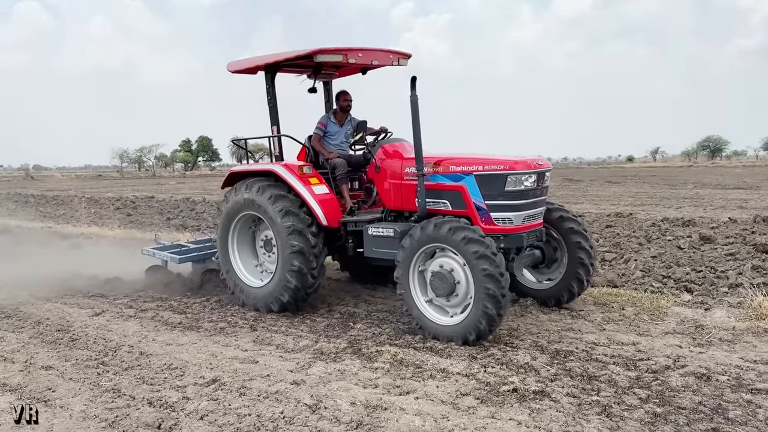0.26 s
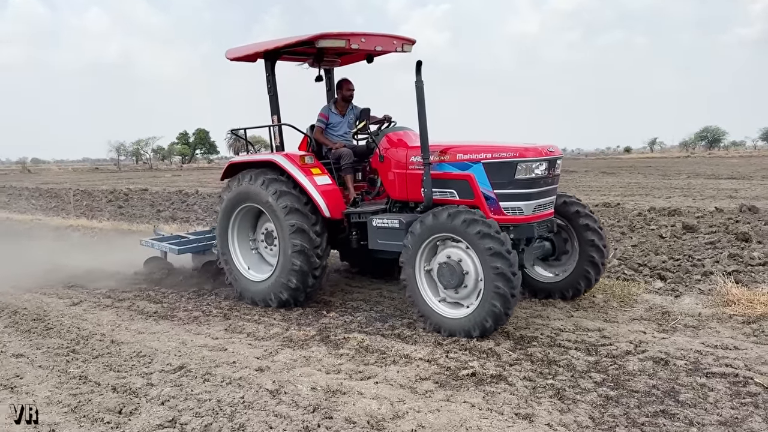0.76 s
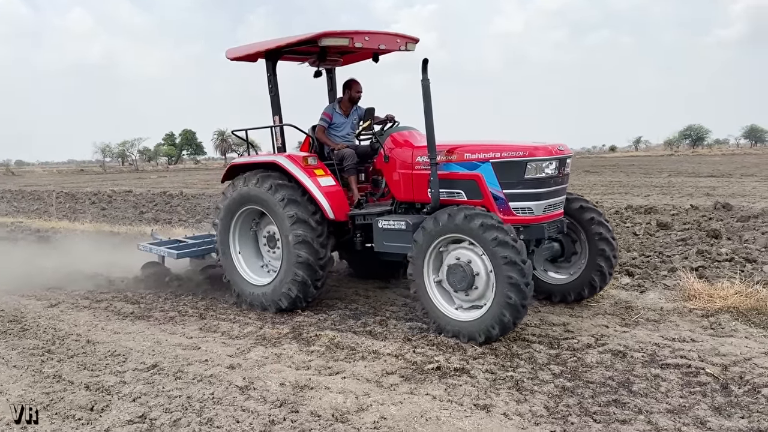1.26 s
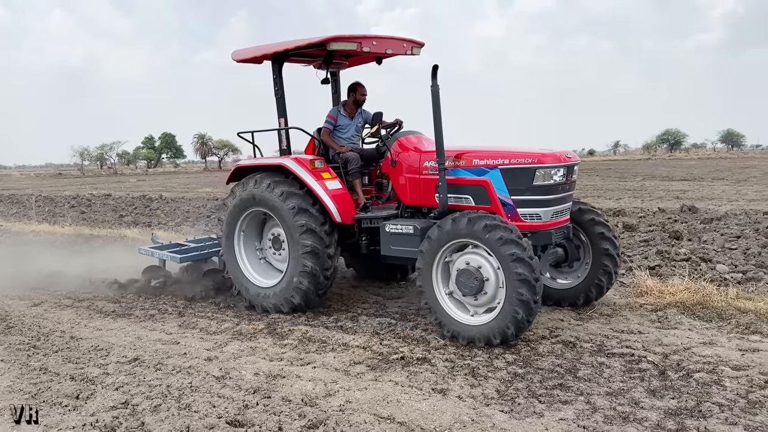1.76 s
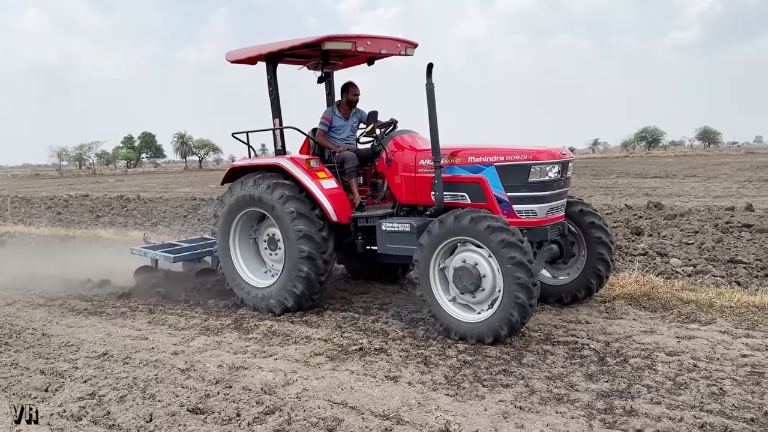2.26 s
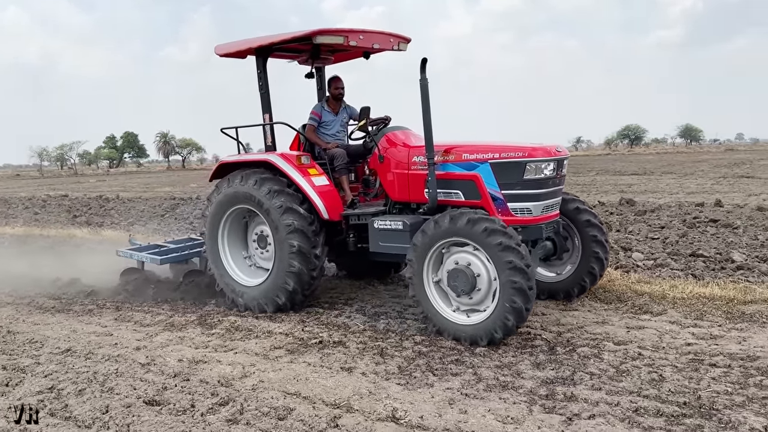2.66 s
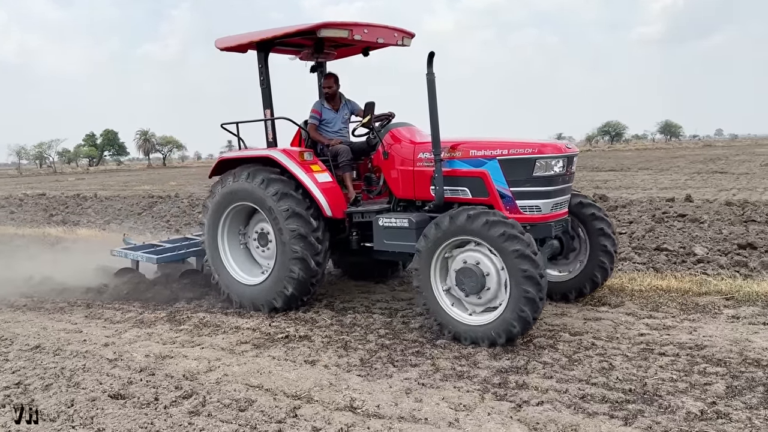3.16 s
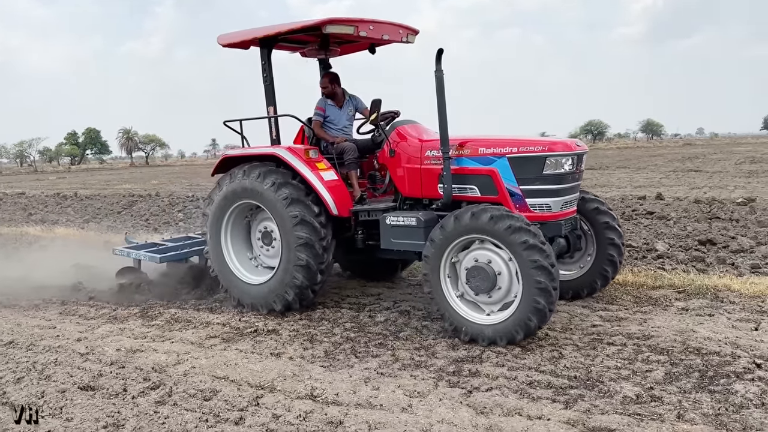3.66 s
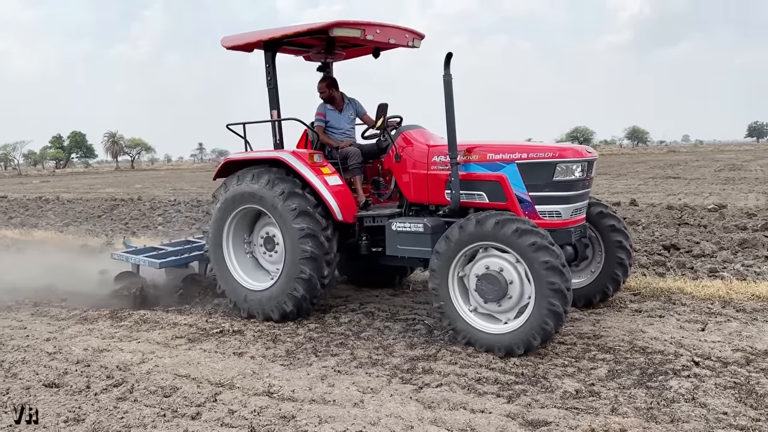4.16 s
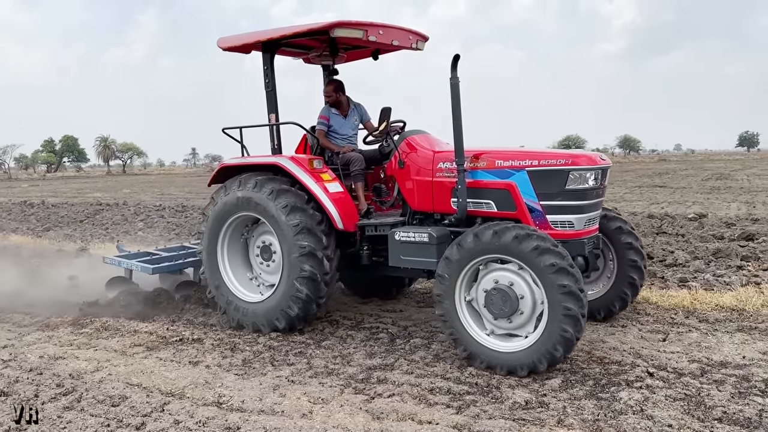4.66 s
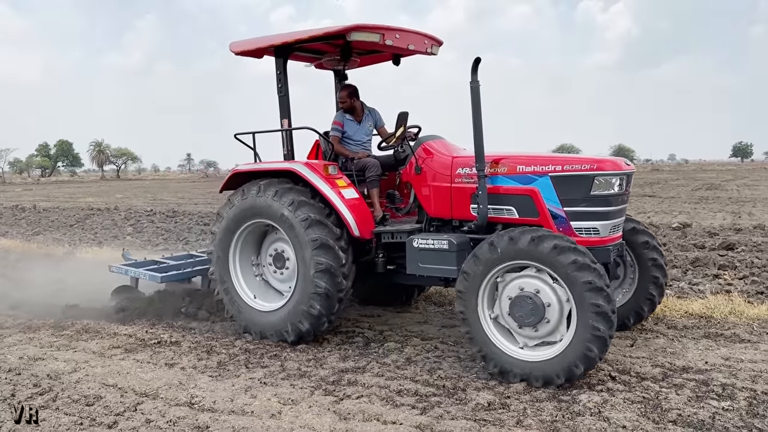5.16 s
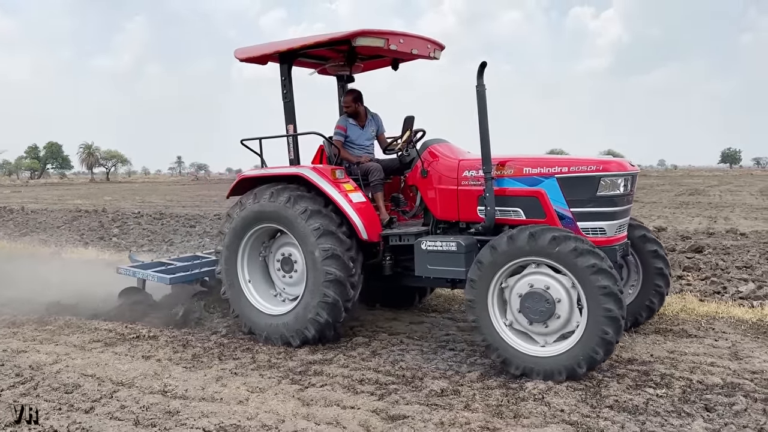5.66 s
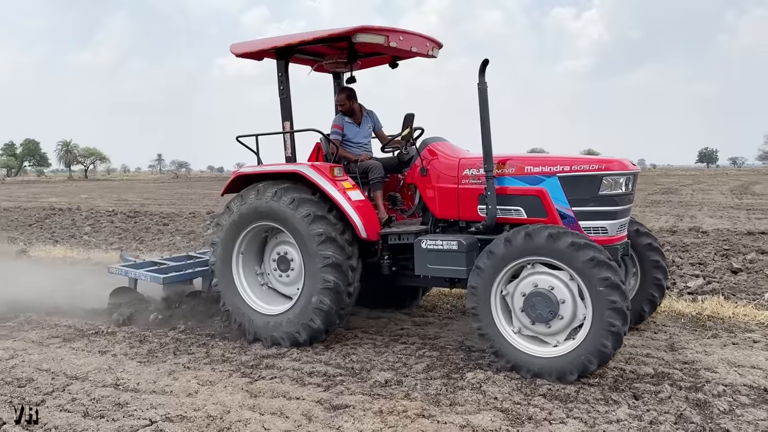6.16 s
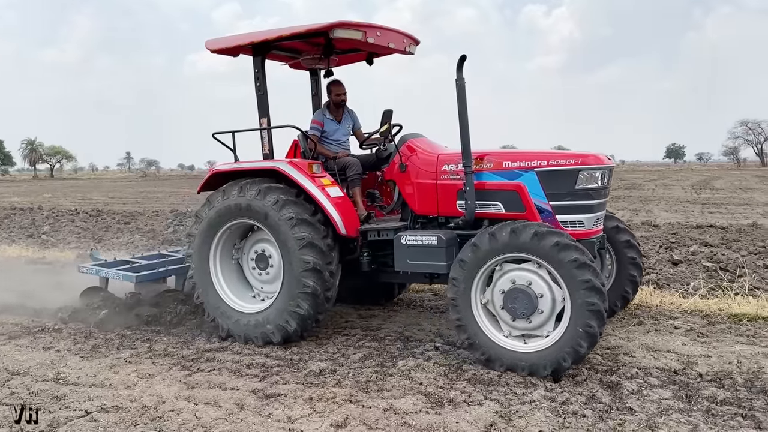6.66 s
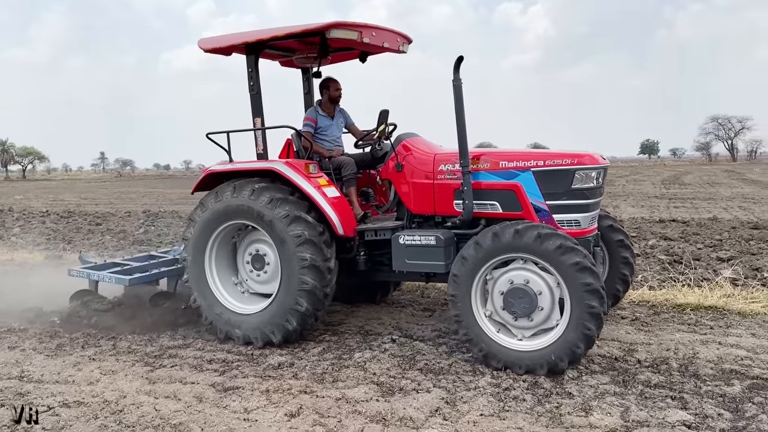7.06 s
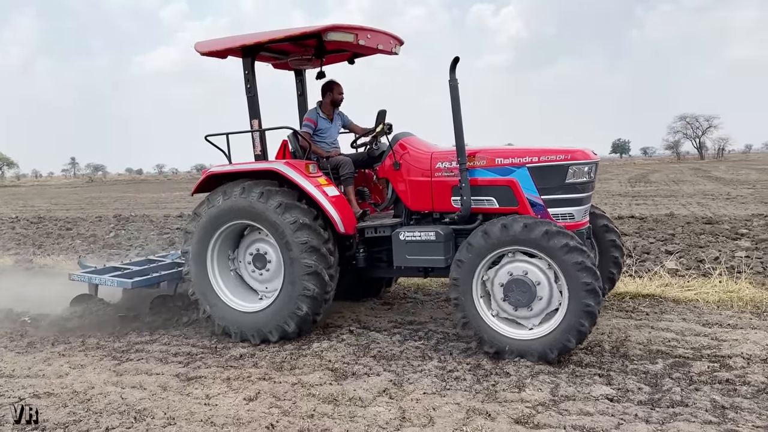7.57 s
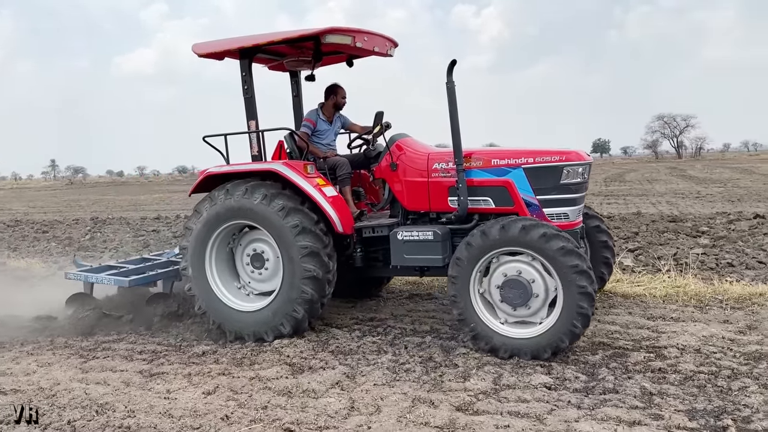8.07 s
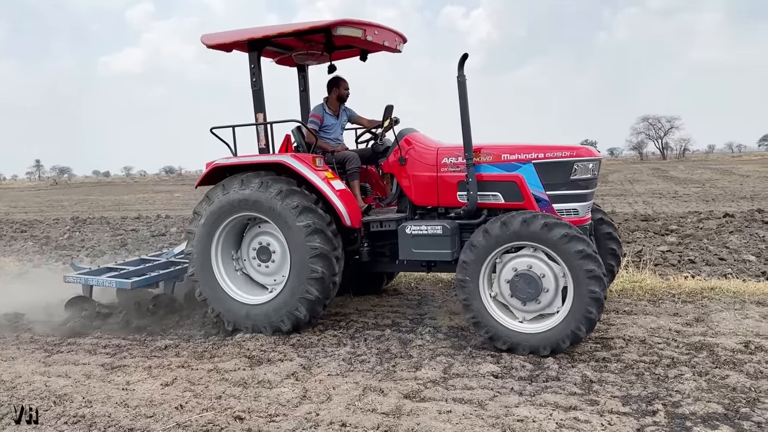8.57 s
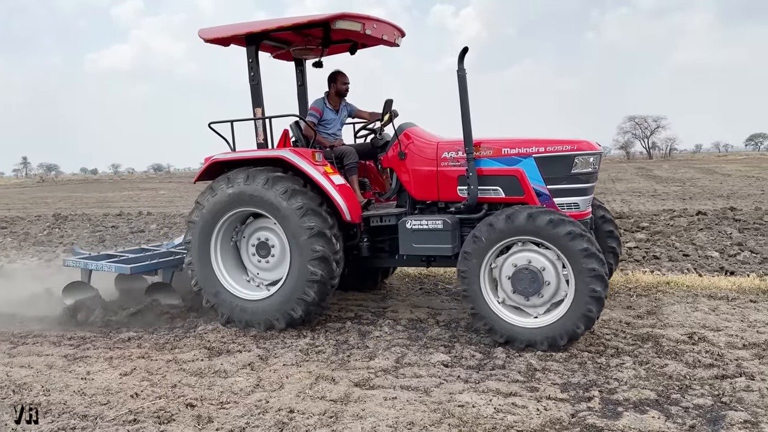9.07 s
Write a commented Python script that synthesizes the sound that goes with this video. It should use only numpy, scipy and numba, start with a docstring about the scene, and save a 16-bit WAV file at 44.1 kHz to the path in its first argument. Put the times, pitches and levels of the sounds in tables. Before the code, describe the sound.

A tractor's four-cylinder diesel knocks and thumps steadily under load, dragging a harrow through dry soil while wind buffets the microphone.

```python
"""A four-cylinder diesel tractor hunts around 980 rpm, dragging a disc harrow over dry soil a few metres off.
Each firing excites block, sheet metal and exhaust resonances, harder while the governor regains speed.
Fan and soil are shaped noise; at the phone's two microphone ports gusts are low noise puffs and brief swings.
The bass drops after the strongest gust."""
import sys
import numpy as np
from scipy import signal
from scipy.fft import rfft, irfft
from scipy.io import wavfile
from scipy.ndimage import uniform_filter1d
from numba import njit

SR = 44100
rng = np.random.default_rng(int(sys.argv[2]) if len(sys.argv) > 2 else 0)


def natural_amplitude(level_db):
    """Convert a level in decibels to a linear amplitude factor, elementwise."""
    exponent = np.asarray(level_db, float) / 20
    return 10 ** exponent


def int16_out(signal):
    """Quantize to a 16-bit WAV file."""
    q = np.round(np.clip(np.atleast_2d(signal).T, -1, 1) * 32767)
    wavfile.write(sys.argv[1], SR, q.astype(np.int16))


N = 411012
T = np.arange(N) / SR
HZ = np.maximum(np.arange(N // 2 + 1) * SR / N, 1)

# engine speed as it hunts: time_s, firings_per_s
SPEED = [(0.0, 30.41), (0.3, 33.67), (0.8, 31.98), (1.17, 34.25), (1.39, 31.6), (2.01, 34.21),
         (2.34, 31.23), (2.69, 33.85), (3.16, 32.5), (3.71, 34.01), (3.99, 30.98), (4.34, 34.35),
         (4.59, 32.42), (5.34, 32.37), (5.62, 30.84), (6.24, 33.58), (6.86, 30.49), (7.25, 33.96),
         (8.12, 30.4), (8.53, 34.11), (9.02, 31.63), (9.32, 31.52)]
# spectrum of a knock, its overall level set later: freq_hz, relative_density_db
KNOCK = [(120, -61), (300, -21.5), (700, -20), (1300, -22), (1550, -22), (2700, -28), (3100, -28.5),
         (5000, -35), (6000, -45.5), (10000, -42), (16000, -50)]


def level(x, db):
    """Scale to an rms level in dB."""
    return x * natural_amplitude(db) / np.sqrt(np.mean(x ** 2))


def along(table, axis):
    """Columns of a table read along time or frequency."""
    points = np.array(table).T
    return [np.interp(axis, points[0], column) for column in points[1:]]


def colour(x, table):
    """Shape the spectrum by (Hz, dB) points on a log frequency axis."""
    hz, db = np.array(table).T
    gain = natural_amplitude(np.interp(np.log(HZ), np.log(hz), db))
    return irfft(rfft(x) * gain, N)


def split(x, hz, side="low"):
    """One side of a second-order Butterworth filter."""
    return signal.sosfilt(signal.butter(2, hz, side, fs=SR, output="sos"), x)


def ring(x, hz, width):
    """A fixed resonance with gain 1 at its centre."""
    return signal.lfilter(*signal.iirpeak(hz, hz / width, fs=SR), x)


@njit
def sweep(x, hz, width):
    """State-variable band-pass whose centre moves."""
    out, band, low = np.empty(len(x)), 0., 0.
    for i in range(len(x)):
        g, damping = np.tan(np.pi * hz[i] / SR), width / hz[i]
        v = (band + g * (x[i] - low)) / (1 + g * (g + damping))
        band, low, out[i] = 2 * v - band, low + 2 * g * v, damping * v
    return out


def sweep_rows(x, hz, width):
    """The moving band-pass on each row of noise."""
    return np.array([sweep(row, hz, width) for row in x])


def walk(rate):
    """Random levels held 1 / rate s and smoothed twice."""
    hold = int(SR / rate)
    steps = np.repeat(rng.standard_normal(N // hold + 1), hold)
    return 1.16 * uniform_filter1d(uniform_filter1d(steps, hold), hold)[:N]


def noise():
    """Three unrelated noises: one for both ports, one for the left alone, one for the right alone."""
    return rng.standard_normal((3, N))


def wind():
    """Turbulent puffs over a thin rumble at the microphones; strong gusts reach higher in pitch."""
    # gust strength before its random waver: time_s, level_db
    gusts = [(0, -20.5), (.3, -19.5), (.85, -22.5), (1.0, -25), (1.6, -23.5), (1.8, -21), (2.35, -22),
             (2.68, -16.5), (2.78, -30.5), (3.4, -23), (4.0, -31.5), (4.15, -20), (4.48, -16.5), (4.7, -20),
             (5.0, -17), (5.2, -22), (5.8, -19.5), (6.3, -24.5), (6.5, -19.5), (7.1, -22.5), (7.38, -28),
             (7.5, -20.5), (8.0, -18.5), (8.2, -14.5), (8.45, -15.5), (8.6, -13), (8.68, -15), (8.9, -19.5),
             (9.32, -15.5)]
    # buffeting spectrum before levelling: freq_hz, relative_density_db
    buffeting = [(12, -48), (24, -29), (34, -23), (55, -3.5), (95, -2.5), (210, -7), (430, -23),
                 (800, -60.5)]
    eddies_per_s = 40
    gust_db, = along(gusts, T)
    gust_db = gust_db + 0.92 * walk(8.1)
    # each 10 ms slot may hold one eddy, each its own size
    chance = rng.random((N // 441, 2))
    size = (chance[:, 0] < eddies_per_s / 100) * natural_amplitude(4.0 * chance[:, 1])
    puffs = uniform_filter1d(uniform_filter1d(np.repeat(size, 441)[:N], 300), 300)
    eddies = colour(natural_amplitude(1.8 * walk(22)) * (0.83 + puffs) * noise(), buffeting)
    low = split(eddies, 130)
    bright = np.clip((gust_db + 25.5) / 13, 0, 1.6)
    high = bright * natural_amplitude(1.5 * walk(45)) * (eddies - low)
    return level(low + high, -0.11) * natural_amplitude(gust_db)


def thuds():
    """A hard eddy sucks the diaphragms out, then pushes them back: little more than one swing."""
    # hardest eddies, level scaling the swing: start_s, level_db, pitch_hz
    hard_eddies = [(0.247, -13, 84.5), (0.45, -7.5, 121), (0.669, -11, 152), (0.898, -12, 113),
                   (2.471, -11, 83.4), (2.673, -2.5, 105), (4.089, -7, 171), (4.161, -2, 113),
                   (4.289, -8, 91), (4.372, -5, 125), (4.435, -8, 200), (4.502, -9, 170), (4.516, -7, 90.5),
                   (4.583, -10, 207), (4.984, -4.5, 75), (7.471, -7, 87.5), (7.738, -5, 71),
                   (8.061, -13, 191), (8.159, -12, 149), (8.231, -5.5, 97.6), (8.29, -9.5, 110),
                   (8.378, 1, 100.5), (8.51, -5, 102), (8.569, -15, 110), (8.59, -9, 191),
                   (8.629, -10, 105), (8.688, -5, 101), (8.723, -6, 150), (8.831, -6, 303)]
    swings = np.zeros(N)
    for start_s, level_db, pitch_hz in hard_eddies:
        age = T - start_s - 1.297 / pitch_hz  # s from the middle of the swing
        envelope = np.exp(-(age * pitch_hz / 0.55) ** 2)
        swings += natural_amplitude(level_db) * envelope * np.sin(2 * np.pi * pitch_hz * age)
    # shares: both ports, left alone, right alone
    return swings * np.array([[1], [.4], [-.4]])


def harrow():
    """Fan hiss and clods tumbling off the discs: noise that flickers, its treble by itself."""
    # fan and soil spectrum before levelling: freq_hz, relative_density_db
    spectrum = [(60, -12.5), (200, -20), (420, -23.5), (700, -24.5), (1300, -30), (1550, -31), (2700, -34),
                (3100, -38), (6000, -48), (10000, -53), (16000, -52.5)]
    flicker_db = .6 * walk(3) + 1.2 * walk(25)
    hiss = level(colour(natural_amplitude(flicker_db) * noise(), spectrum), -25.5)
    treble = split(hiss, 3000, "high")
    return hiss + (natural_amplitude(0.95 * walk(14)) - 1) * treble


def firings():
    """Crank timing: number of the current firing, seconds since it, and chance values for each firing."""
    rate, = along(SPEED, T)
    turns = .32 + np.cumsum(rate) / SR  # in firings
    count = turns.astype(int)
    return count, (turns - count) / rate, rng.standard_normal((count[-1] + 1, 20))


def load():
    """Slow levels as the tractor turns side-on, plus fuel that follows the gain in engine speed."""
    # before fuel is added: time_s, knock_db, bonnet_panel_db, tin_rattle_db,
    # drifting_resonance_hz, drifting_resonance_db, exhaust_db
    levels = [(0, -35.5, -36, -43.5, 1160, -38.5, -21.5), (1.2, -32.5, -42, -49, 1197, -35.5, -20.5),
              (2.4, -32.5, -37, -47, 1264, -31.5, -21.5), (3.3, -34, -39, -46, 1306, -30.5, -19),
              (4.6, -31.5, -33.5, -50.5, 1257, -31.5, -19.5), (5.1, -32.5, -33, -51, 1160, -34, -19.5),
              (5.65, -31, -26, -49, 1220, -39, -20), (6.2, -31.5, -35, -67, 1280, -35.5, -19.5),
              (7.1, -32, -34.5, -44, 1233, -33, -21), (8.1, -30, -34, -44.5, 1237, -32, -17.5),
              (8.9, -32, -32, -43.5, 1220, -36.5, -24.5), (9.32, -29.5, -41, -36, 1250, -30, -20)]
    # dB for each firing per second gained in a second: knock, panel, tin, drifting resonance, exhaust
    fuel_db = [0.17, 0.11, 0.52, 0.21, 0.18]
    knock_db, panel_db, tin_db, ridge_hz, ridge_db, thump_db = along(levels, T)
    rate, = along(SPEED, T)
    governor_s = 0.19  # the gain in speed is averaged over this time
    fuel = uniform_filter1d(np.gradient(rate) * SR, int(governor_s * SR))
    slow_db = np.array([knock_db, panel_db, tin_db, ridge_db, thump_db])
    return ridge_hz, slow_db + np.outer(fuel_db, fuel)


def strokes(count, since, chance, cylinder_db, knock_db):
    """Size and lateness of each combustion: its cylinder and chance, or a set hard knock."""
    # hardest knocks, level aimed at their peak: start_s, level_db
    hard = [(0.791, -16.5), (0.822, -18), (1.037, -14), (1.644, -15.5), (2.372, -19), (3.824, -16.5),
            (3.946, -18.5), (4.074, -23), (4.198, -17.5), (4.232, -16), (4.317, -15), (4.801, -15.5),
            (4.864, -18.5), (4.927, -15.5), (5.171, -19), (5.578, -14.5), (5.673, -16), (5.835, -16),
            (5.928, -16.5), (6.293, -14.5), (6.791, -13.5), (6.95, -15.5), (7.048, -16), (7.078, -17),
            (7.171, -13.5), (7.935, -17), (8.097, -15), (8.165, -13.5)]
    late_s = np.abs(0.00112 * chance[:, 0])
    size_db = cylinder_db + 1.7 * np.clip(chance[:, 1], -3, 1.5)
    start_s, hard_db = np.transpose(hard)
    at = ((start_s + 0.00734) * SR).astype(int)
    crest_db = 11  # a typical knock peaks this far above the knock level
    size_db[count[at]] = hard_db - knock_db[at] - crest_db
    late_s[count[at]] = np.clip(since[at] - 0.008, 0, 0.01)
    return size_db, late_s


def burst(count, age, size_db, decay_s, rise_s):
    """Envelope of each combustion: quick rise, slower fall, every one its own size."""
    return natural_amplitude(size_db[count]) * (1 - np.exp(-age / rise_s)) * np.exp(-age / decay_s)


def piston_clonk(count, age, chance, size_db):
    """Each ignition slaps the piston: two or three swings that swell, die and sag, at their own pitch."""
    swell_s = .0019
    pitch_hz = 720 * np.exp(0.3 * np.clip(chance[count, 18], -2, 2) - age / 0.025)
    swell = (age / swell_s * np.exp(1 - age / swell_s)) ** 2
    clonk_db = -7 + size_db[count] + 0.8 * np.clip(chance[count, 19], -2, 1)
    return natural_amplitude(clonk_db) * swell * np.sin(2 * np.pi * (pitch_hz * age + chance[count, 3]))


def block_knock(count, age, chance, size_db, blows):
    """Combustion blows and piston clonk, with the ringing modes of block and covers."""
    # modes of block and covers, before each stroke's own share: pitch_hz, width_hz, relative_db
    modes = [(350, 29, 8.5), (935, 100, 12.5), (1830, 130, -6), (2070, 720, -8), (2550, 230, -0.5),
             (3700, 380, -5.5), (5900, 170, -9.5)]
    # no two strokes strike the block alike
    block = 0
    for k, (pitch_hz, width_hz, mode_db) in enumerate(modes):
        share_db = mode_db + 7.0 * np.clip(chance[count, 6 + k], -2, 1.2)
        block = block + ring(natural_amplitude(share_db) * blows, pitch_hz, width_hz)
    # hard strokes gain only bass; the treble of a stroke varies on its own
    body = split(blows, 1500)
    edge_gain = natural_amplitude(chance[count, 5] - size_db[count]) * (0.28 + 1.2 * np.exp(-age / 0.0098))
    edge = (blows - body) * edge_gain
    # the topmost fizz varies again by itself
    fizz = split(edge, 7000, "high")
    edge = edge + (natural_amplitude(4.2 * chance[count, 16]) - 1) * fizz
    direct = colour(body + edge + piston_clonk(count, age, chance, size_db), KNOCK)
    return level(level(direct, 0) + level(block, -7.0), 2.43)


def bonnet_panel(blows):
    """The bonnet panel rings low under the blows and a little steady noise."""
    return level(ring(ring(blows + .5 * noise(), 569.6, 22.0), 558, 50), -4.5)


def drifting_resonance(blows, ridge_hz):
    """A broad resonance near 1.2 kHz that slowly drifts, perhaps the ground echo."""
    driven = blows + 0.4 * noise()
    return level(sweep_rows(sweep_rows(driven, ridge_hz, 190.0), ridge_hz, 370.0), -2.8)


def tin_rattle(count, age, chance, size_db):
    """Loose sheet metal rattles at another pitch on every stroke."""
    shake_db = 5.5 * np.clip(chance[:, 2], -2, 1.5) + 1.1 * size_db
    shake = burst(count, age, shake_db, decay_s=0.0072, rise_s=0.00032)
    tin_hz = uniform_filter1d(4720 + 120 * chance[count, 17], 64)
    return level(sweep_rows(ring((shake + 0.074) * noise(), 3960, 1400), tin_hz, 280.0), -1.3)


def ringing_metal(gate, blows):
    """A cover sings in a narrow band and the tin holds a lasting three-part ring."""
    # time_s, singing_cover_db, lasting_tin_ring_db
    levels = [(0, -38, -55), (.5, -40, -65), (1.2, -41, -66), (2.2, -47.5, -64), (2.9, -45, -49),
              (3.3, -36.5, -40.5), (3.9, -45, -62), (5, -52, -57), (6.6, -67, -59), (7.3, -53, -53),
              (8.2, -40, -47), (9.32, -43, -64)]
    cover_db, lasting_db = along(levels, T)
    cover = ring(ring(blows + .5 * noise(), 757.0, 17.0), 777, 37)
    lasting = sum(ring((gate / gate.mean() + 0.4) * noise(), hz, 45.0) for hz in (4640, 4760, 4900))
    return level(cover, 0) * natural_amplitude(cover_db) + level(lasting, 0) * natural_amplitude(lasting_db)


def small_parts(count, chance, gate):
    """Small parts chime briefly, each stroke at its own pitch, beside a metallic jangle near 2.7 kHz."""
    # time_s, chime_db, jangle_db
    levels = [(0, -51, -50), (1.8, -50, -50), (2.4, -45, -48), (3.3, -46, -48), (4.3, -50, -47),
              (5, -50, -43), (7.7, -50, -43), (8.2, -47, -43), (9.32, -51, -46)]
    chime_db, jangle_db = along(levels, T)
    chime_hz = 5200 * np.exp(0.238 * np.clip(chance[count, 15], -2, 2))
    chime = sweep_rows(sweep_rows(gate * noise(), chime_hz, 260.0), chime_hz, 420.0)
    jangle = ring(ring(np.sqrt(gate) * noise(), 2610, 240.0), 2650, 330.0)
    return level(colour(chime, KNOCK), 0) * natural_amplitude(chime_db) + level(jangle, 0) * natural_amplitude(jangle_db)


def exhaust(count, chance, cylinder_db):
    """One puff of gas a firing reaches the stack a little later and rings its pipe tones."""
    # pipe tones before wavering and levelling: pitch_hz, width_hz, relative_db, signed_gain
    stack = [(33, 40, -15, 0.84), (65.8, 49, -2.5, -0.61), (95.2, 37.8, 0.5, 0.87), (134, 12, -33, -0.48),
             (194, 53, -10, -0.45), (275.5, 107, -14.5, 0.64)]
    delay_s, waver_db = 0.0028, 2.2  # waver scale at 200 Hz; higher tones waver more
    jitter = (0.0002 * SR * chance[1:, 3]).astype(int)
    at = np.flatnonzero(np.diff(count)) + int(delay_s * SR) + jitter
    puffs = np.zeros(N)
    puffs[np.clip(at, 0, N - 1)] = natural_amplitude(0.46 * cylinder_db[1:] + 1.0 * chance[1:, 4])
    tones = 0
    for hz, width, tone_db, sign in stack:
        gain = sign * natural_amplitude(tone_db + waver_db * hz / 200 * walk(7))
        tones = tones + gain * ring(ring(puffs, hz, width), hz, width)
    return level(tones, 0)


def engine():
    """Block knock, ringing and rattling metal and the exhaust thump, all on one crank."""
    # the four cylinders in firing order: relative_db
    cylinders = [-1.55, -3.1, 1.5, -1]
    count, since, chance = firings()
    cylinder_db = np.resize(cylinders, len(chance))
    ridge_hz, (knock_db, panel_db, tin_db, ridge_db, thump_db) = load()
    size_db, late_s = strokes(count, since, chance, cylinder_db, knock_db)
    age = np.maximum(since - late_s[count], 0)  # s since combustion
    gate = burst(count, age, size_db, decay_s=0.012, rise_s=0.0017)
    # a fast random waver roughens each burst
    blows = gate * natural_amplitude(0.55 * walk(400)) * noise()
    sound = block_knock(count, age, chance, size_db, blows) * natural_amplitude(knock_db)
    sound = sound + bonnet_panel(blows) * natural_amplitude(panel_db)
    sound = sound + drifting_resonance(blows, ridge_hz) * natural_amplitude(ridge_db)
    sound = sound + tin_rattle(count, age, chance, size_db) * natural_amplitude(tin_db)
    sound = sound + ringing_metal(gate, blows) + small_parts(count, chance, gate)
    thump = exhaust(count, chance, cylinder_db) * natural_amplitude(thump_db)
    # thump shares: both ports, left alone, right alone
    return sound + thump * np.array([[1], [.6], [.6]])


def dips(x):
    """Take out part of two narrow bands that slide as the tractor turns, likely the ground echo."""
    # time_s, upper_hz, upper_depth (0-1), lower_hz, lower_depth (0-1)
    valleys = [(0, 1540, 0.34, 810, 0.45), (1.5, 1550, 0.43, 800, 0.4), (1.9, 1400, 0.8, 860, 0.4),
               (2.15, 1600, 0.9, 1080, 0.5), (3.5, 1500, 0.5, 1110, 0.1), (4.3, 1500, 0.6, 1090, 0.44),
               (5.2, 1370, 0.2, 1090, 0), (6.3, 1450, 0.25, 1010, 0), (7.0, 1440, 0.46, 960, 0.3),
               (7.6, 1460, 0.2, 955, .5), (9.32, 1450, .4, 1040, 0.1)]
    upper_hz, upper, lower_hz, lower = along(valleys, T)
    for hz, depth, width in [(upper_hz, upper, 200.0), (lower_hz, lower, 90.0)]:
        x = x - np.clip(depth, 0, 1) * sweep_rows(x, hz, width)
    return x


def scene():
    """Each microphone port hears the common sound, shifted in phase, and a part of its own."""
    # freq_hz, common_power_share (0-1), left_lead_rad, left_minus_right_db
    port_table = [(0, .86, .1, .3), (250, .84, .15, .3), (700, .95, .1, 0), (1000, .85, .5, 4.5),
                  (1300, .88, 0, 1.5), (1550, .5, .6, 2.5), (2000, .75, 0, 2), (3000, .65, 1.9, -1.5),
                  (3600, .5, .8, 1.5), (4200, .25, 1, 2), (4600, .6, -.6, 1.5), (5700, .55, .7, 3),
                  (7500, .45, 1.6, 5), (8300, .92, 0, .5), (10200, .85, -2.3, 0), (10600, .995, -3, 0),
                  (11700, .995, -3.3, 0), (13000, .8, -5, 0), (14000, .99, -6.28, 0), (16000, .9, -6.5, 0)]
    both, left, right = rfft(dips(engine() + harrow()) + wind() + thuds())
    alike, lead, balance_db = along(port_table, HZ)
    turn, tilt = np.exp(.5j * lead), natural_amplitude(balance_db / 2)
    common, own = np.sqrt(alike) * both, np.sqrt(1 - alike)
    ports = [(common * turn + own * left) * tilt, (common / turn + own * right) / tilt]
    return irfft(np.array(ports), N)


def top_cut(x):
    """Nothing passes above the cut-off."""
    return signal.sosfilt(signal.butter(12, 15900, fs=SR, output="sos"), x)


def record(dry):
    """Deep bass is cut, and more bass near the end; top treble is band-limited; loud peaks are rounded."""
    cut_s, cut_hz = 8.76, 160
    bass = signal.sosfilt(signal.butter(1, cut_hz, fs=SR, output="sos"), dry)
    cut = 0.9 * np.clip((T - cut_s) / 0.015, 0, 1)
    thin = signal.sosfilt(signal.butter(4, 28, "high", fs=SR, output="sos"), dry - cut * bass)
    thin = signal.sosfilt(signal.ellip(8, .2, 70, 15700, fs=SR, output="sos"), thin)
    # soft rounding, then a hard stop at full scale
    mix = np.clip(1.333 * np.tanh(thin / 1.282), -1, 1)
    return top_cut(mix)


dry = scene()
out = record(dry)
int16_out(out)
```